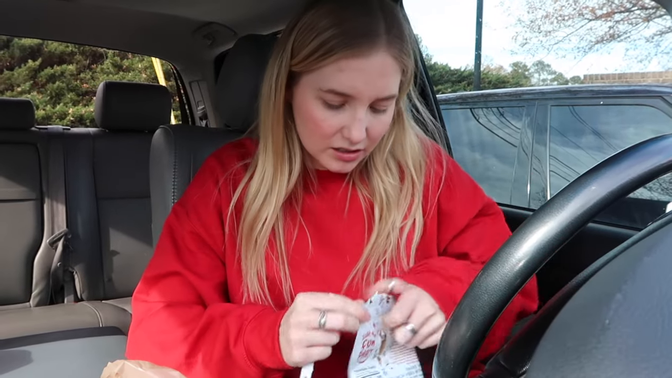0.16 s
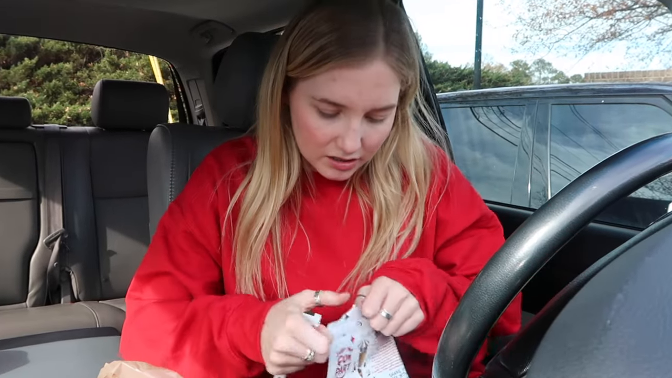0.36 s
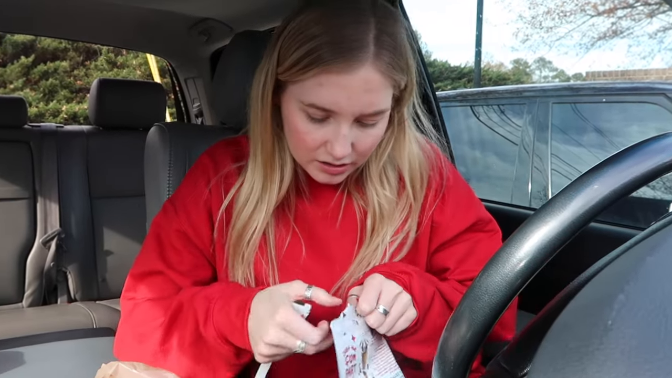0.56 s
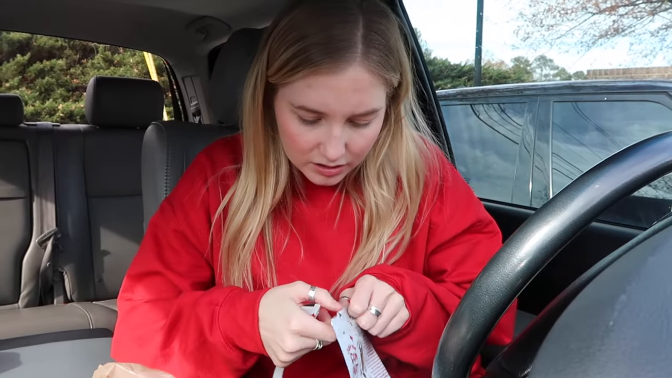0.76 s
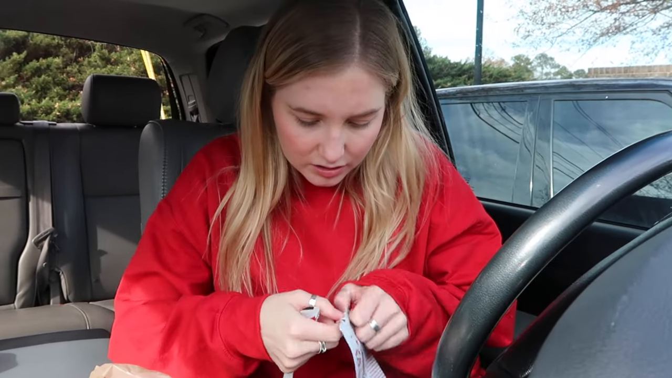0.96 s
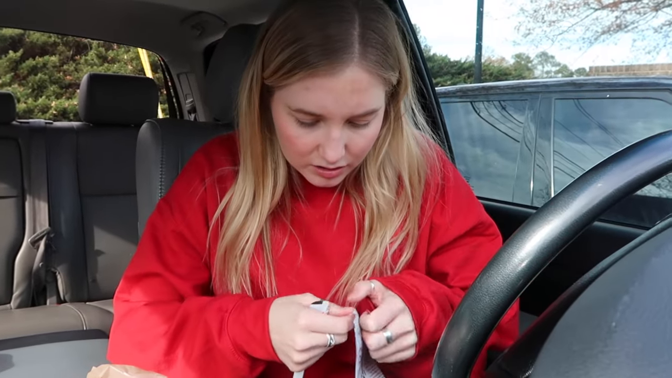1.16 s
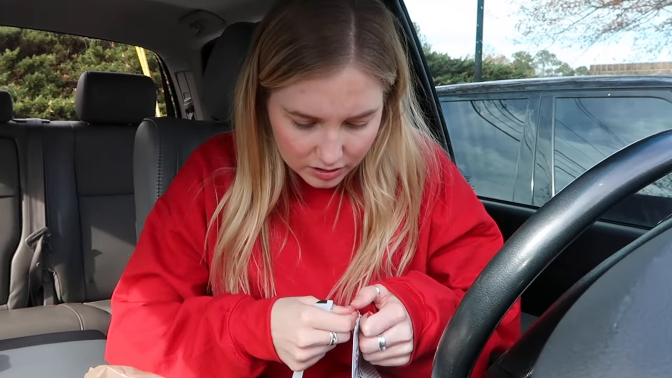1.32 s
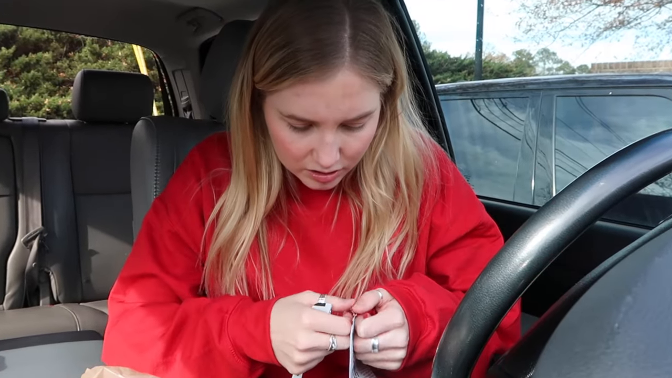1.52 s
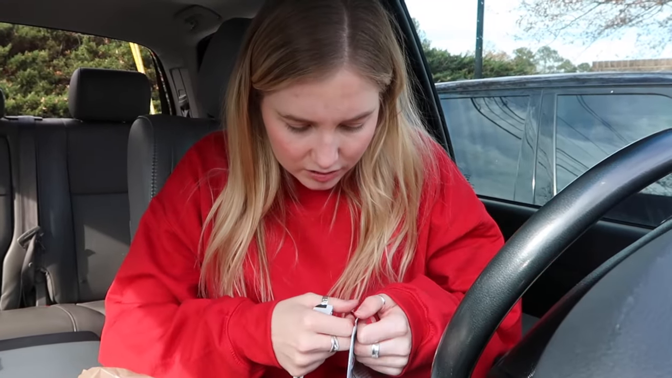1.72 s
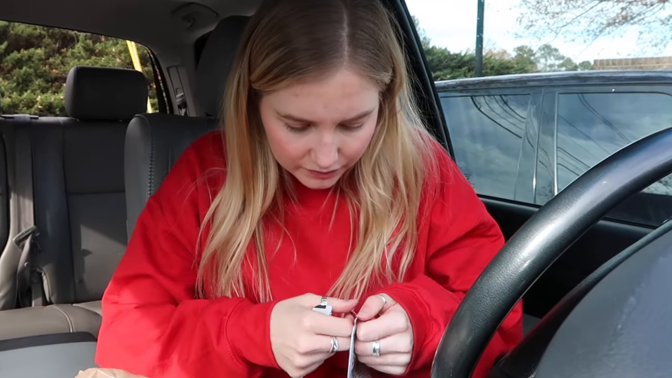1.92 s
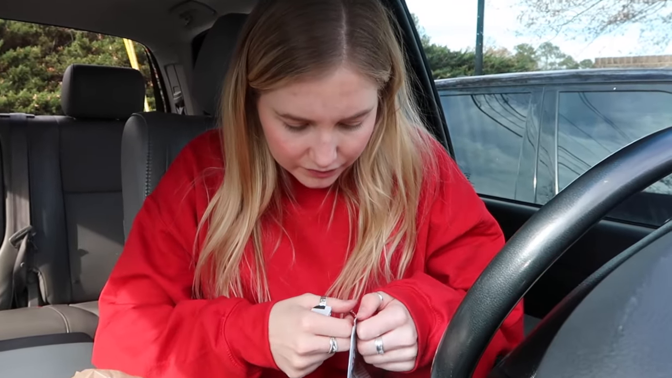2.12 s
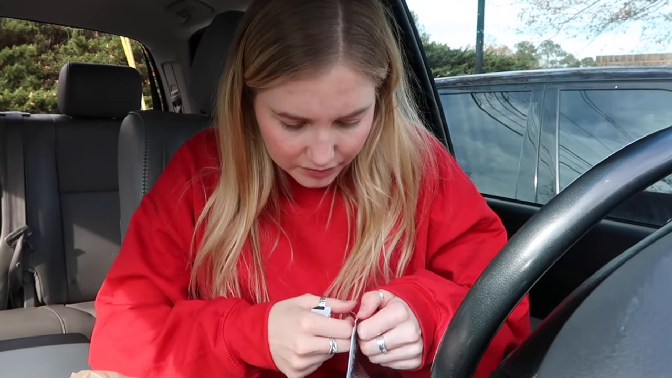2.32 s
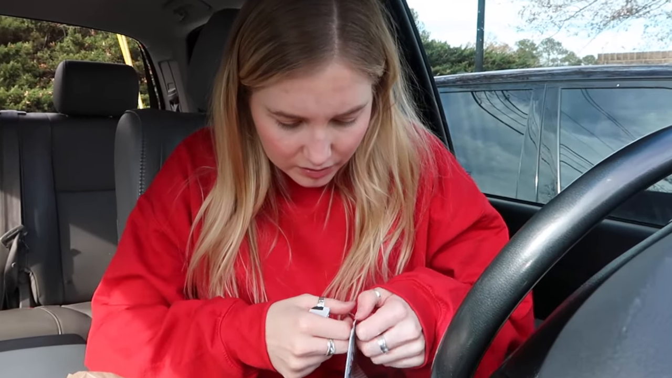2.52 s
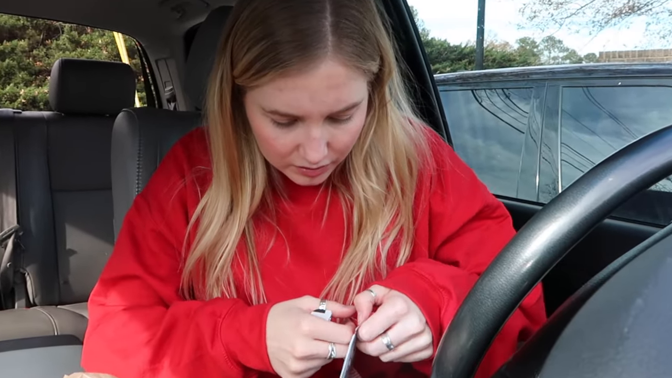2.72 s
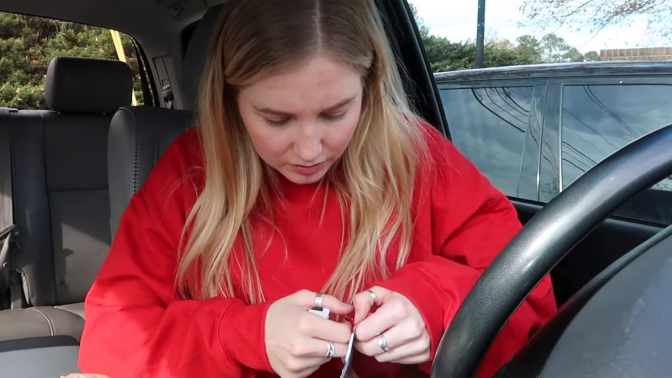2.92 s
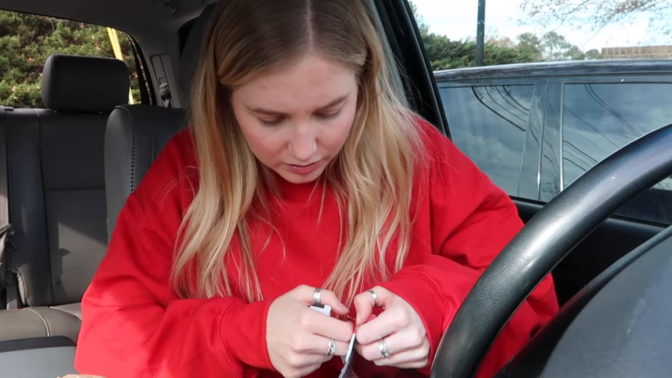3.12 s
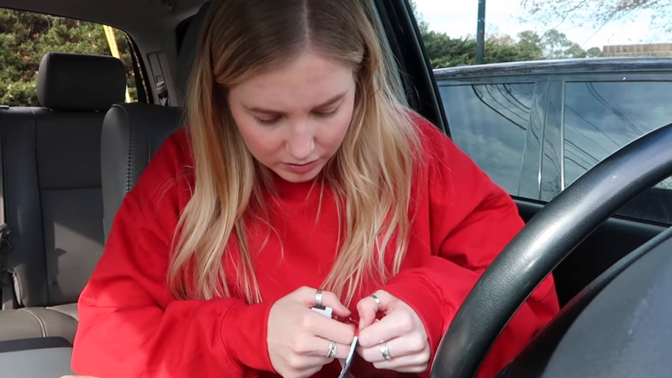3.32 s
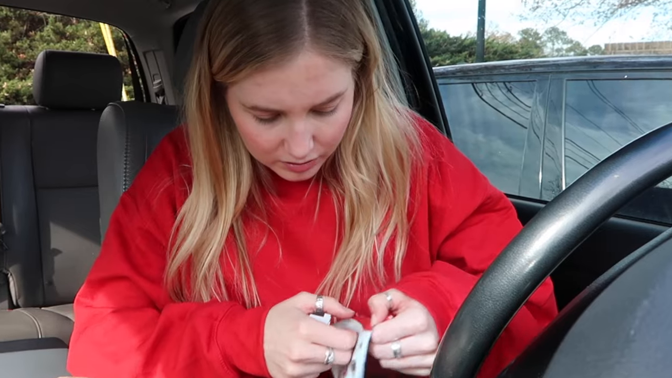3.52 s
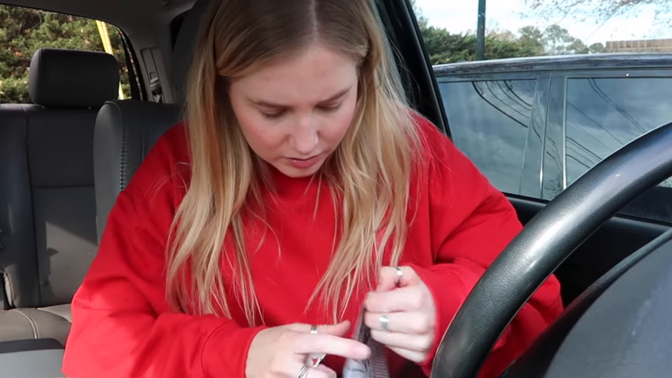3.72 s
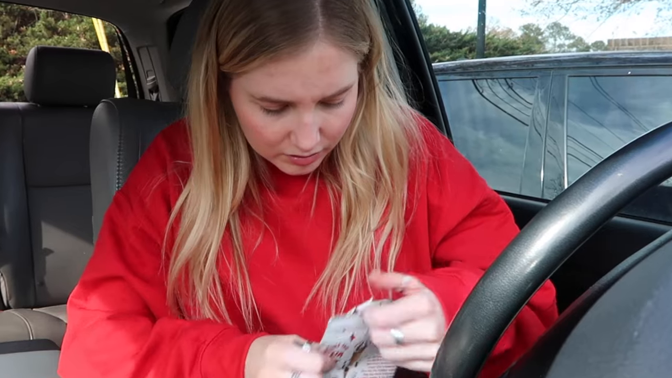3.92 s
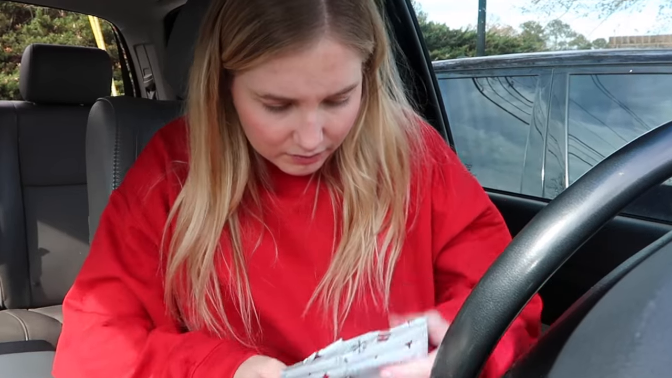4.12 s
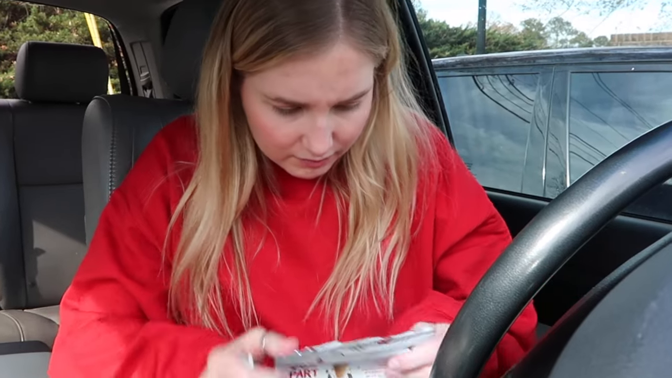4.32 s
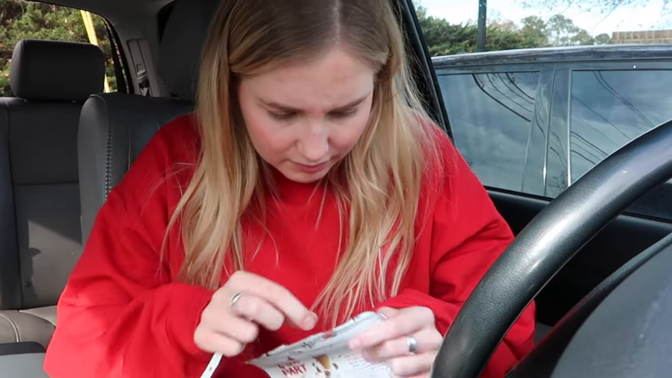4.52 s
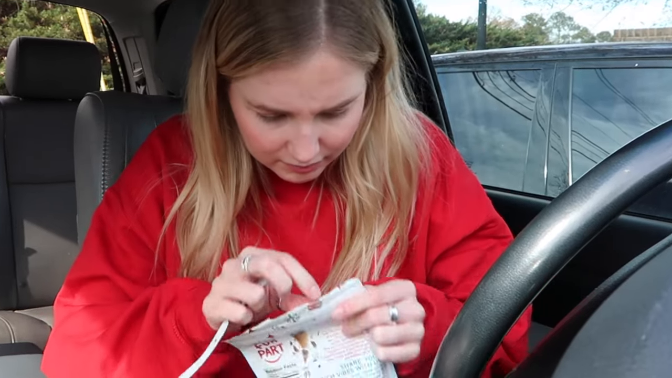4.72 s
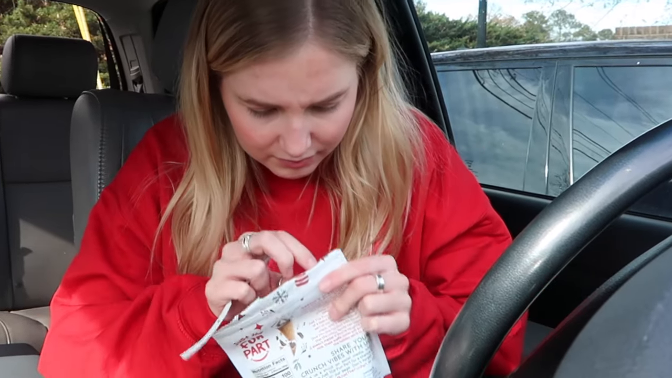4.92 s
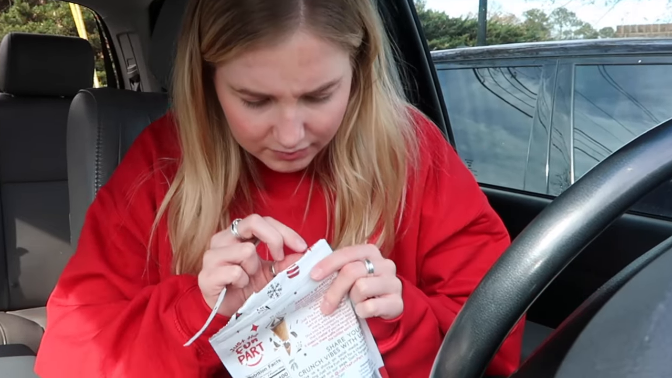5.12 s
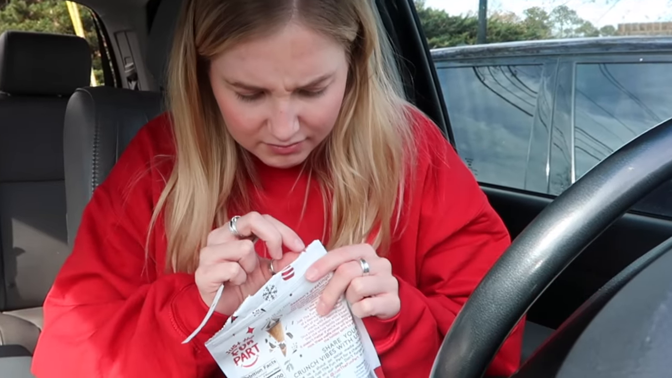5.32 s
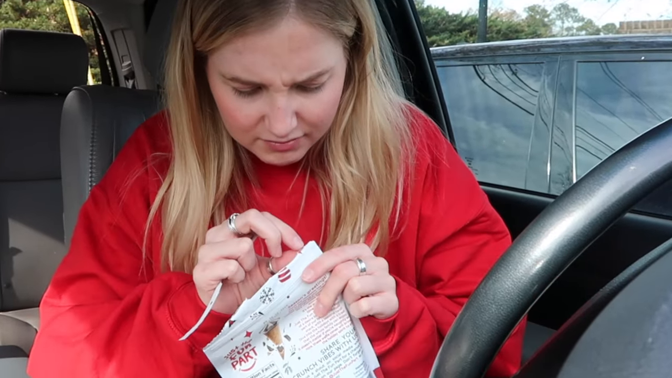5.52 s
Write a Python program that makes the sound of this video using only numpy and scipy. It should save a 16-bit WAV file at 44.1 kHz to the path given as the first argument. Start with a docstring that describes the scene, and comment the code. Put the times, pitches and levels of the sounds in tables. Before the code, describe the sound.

A plastic snack bag is gripped, picked at and turned over in a parked car. Crisp pops and rustling come first, fade to tiny ticks while the fingers work at the seam, return as a thick crackling flurry with brief rubbing, and end sparse. Dry, near sound with a very short cabin reflection; soft deep rumble throughout, no speech.

```python
"""Inside a parked car, fingers pick at the top of a stiff plastic snack pouch and turn it over.
The film buckles in sharp snaps: shaped noise bursts with a kick, ringing briefly in panel and facet.
Between them lie a fine crinkle of random grains, rubbing with narrow squeaks, and faint ticks of nails.
Decaying noise makes the quick answer of the small padded cabin; filtered noise makes a low rumble,
hiss and a thin electronic whine underneath."""
import sys
import numpy as np
from scipy import signal
from scipy.fft import rfft, irfft, next_fast_len
from scipy.io import wavfile
from scipy.ndimage import uniform_filter1d

SR = 44100
rng = np.random.default_rng(int(sys.argv[2]) if len(sys.argv) > 2 else 0)


def persist_wave(psi):
    """Save psi, clipped to +-1, as 16-bit WAV."""
    counts = np.round(np.clip(psi, -1, 1) * 32767).astype(np.int16)
    wavfile.write(sys.argv[1], SR, np.atleast_2d(counts).T)


N = 249606
TIME = np.arange(N) / SR

# Level of the deepest rumble before its trim. Each row: time in seconds, level in dB.
DEEP_LEVEL = [(0.0, -45.5), (0.43, -52), (0.76, -44), (0.85, -51.5), (1.04, -46), (1.7, -48.5),
              (1.94, -40.5), (2.28, -46), (4.3, -48), (4.41, -52), (4.9, -43), (5.41, -52), (5.42, -44),
              (5.66, -47)]
# Level of the upper rumble before its trim. Each row: time in seconds, level in dB.
UPPER_RUMBLE_LEVEL = [(0, -42), (.5, -47), (1.2, -45.5), (1.6, -48.5), (2.0, -47), (2.5, -48), (3.9, -43),
                      (4.45, -48.5), (4.85, -47), (5.66, -47)]
# Relative spectrum of rumble and hiss. Each row: frequency in Hz, density in dB per Hz.
RUMBLE_SPECTRUM = [(12, -42), (24, -11), (39, 1.5), (52, -3.5), (143, -14.5), (183, -12.5), (347, -22.5),
                   (511, -26), (693, -30.5), (889, -33), (1390, -35), (1510, -37.5), (3760, -41),
                   (12400, -56), (13400, -100), (15000, -104)]
# Relative spectrum of the noise in the side signal. Each row: frequency in Hz, density in dB per Hz.
SIDE_HISS_SPECTRUM = [(25, -21), (170, 0.5), (330, 3.5), (600, -4.5),
                      (2000, -11.5), (8000, -26.0), (15000, -23.0)]
# The fingers regrip or turn the pouch; levels before their trims.
# Each row: start in seconds, end in seconds, crinkle in dB, fine fizz in dB.
MOVES = [(0.0, 0.18, -46.5, -57), (0.276, 0.346, -36.5, -62), (0.457, 0.492, -43.5, -52.5),
         (0.838, 1.108, -49, -53.5), (3.735, 3.838, -43.5, -49), (3.975, 4.322, -46.5, -49.5),
         (4.354, 4.442, -45.5, -53), (4.647, 4.763, -50.5, -57.5), (4.897, 5.04, -52.5, -55.5)]
# Relative spectrum of the crinkling film. Each row: frequency in Hz, density in dB per Hz.
CRINKLE_SPECTRUM = [(120, -52), (200, 1.5), (402, -1.5), (854, -7), (930, -5), (1240, -6.5), (2150, -7.5),
                    (2550, -6.5), (6000, -22.5), (7800, -24), (13200, -120)]
# Relative spectrum of the fine fizz. Each row: frequency in Hz, density in dB per Hz.
FIZZ_SPECTRUM = [(3000, -2.5), (5000, -9.5), (8000, -4.5), (11000, -17.5), (13500, -19), (15000, -45)]
# Buckles of the film, before the common trim. Each row: time in seconds, crack level in dB,
# low end, body and edge in dB relative to the crack, ring T60 in seconds, panel pitch in Hz, facet pitch in Hz.
SNAPS = [(0.031, -47.5, 11.5, 6, -26, 0.18, 540, 2300), (0.06, -28, -19, -12.5, -4, 0.036, 1230, 2920),
         (.075, -45.5, 5, 10, 13.5, 0.031, 1500, 3040), (0.132, -44, -30, 2, -3.5, 0.058, 1380, 2130),
         (.2305, -28.5, -2, -5, -19, 0.027, 1140, 2770), (0.237, -28, -4.5, -4, -31, 0.056, 1110, 2880),
         (.248, -31.5, -7, -17, -22, 0.021, 1610, 2400), (0.2793, -30, -12, 6, -2, 0.03, 1080, 1830),
         (0.2981, -29.5, 0.5, -4, -4.5, 0.066, 980, 3760), (.311, -30.5, -2, -6, -19, 0.032, 1620, 3680),
         (.333, -37, 1.5, -0.5, -6, 0.056, 1180, 2730), (.346, -45.5, 2, -2, 5, .04, 900, 2300),
         (0.37, -16, -13, -16.5, -3, 0.019, 1900, 2820), (0.6068, -31, -12, -2.5, -10.5, 0.037, 1350, 1900),
         (.69, -44, 10, 9, -28, 0.17, 930, 2540), (.729, -32.5, -10, -10, -21, 0.21, 1550, 2520),
         (0.878, -42.5, -1, -20, -8, 0.032, 477, 2600), (.947, -47.5, 13, 5.5, -31, 0.036, 1130, 2310),
         (0.984, -47, -2, 8.5, -7, 0.033, 1160, 1980), (1.039, -45.5, 5, 3, -13, 0.084, 630, 2270),
         (1.0545, -30, -14, -26, -10.5, 0.063, 1570, 2560), (1.066, -33, -10, -10, -10, 0.052, 1680, 2340),
         (1.099, -46, -1, 12, -25, 0.019, 910, 2280), (1.138, -47.5, -6, -29, -20, 0.026, 930, 1900),
         (1.213, -47.5, 7.5, 8.5, -17, 0.076, 980, 3400), (1.2196, -31, -8, -13, -7, 0.04, 960, 5200),
         (1.2367, -30, -9.5, -6.5, -6.5, 0.04, 940, 1820),
         (1.2932, -29.5, -1.5, -4.5, -11.5, 0.04, 990, 1730),
         (1.391, -46.5, -2, -6.5, -4.5, 0.15, 970, 2700), (1.51, -42, -8, -5.5, -4, 0.28, 1630, 2550),
         (1.525, -45, 0, -6, -1.5, 0.33, 1380, 3560), (1.872, -48.5, -14, -12, -5, 0.14, 930, 3300),
         (1.891, -50, -4, 4.5, 11.5, 0.033, 430, 7000), (2.136, -66, 20.5, 17, -20, 0.045, 515, 1140),
         (2.301, -60.5, -2, 1, 5, 0.083, 1430, 4000), (2.673, -48, -0.5, -3, -38, 0.035, 750, 1870),
         (2.684, -55.5, 7, 10.5, -35, .04, 600, 2300), (2.93, -42, 4.5, -6, -30, 0.025, 706, 2320),
         (2.939, -51.5, 12.5, 5, -25, 0.069, 615, 1710), (2.955, -52.5, 10.5, 4, -17, 0.054, 600, 2300),
         (3.058, -65.5, 11, 15, -17, 0.038, 1030, 1720), (3.161, -61, 13, 14, -11, 0.035, 1010, 1910),
         (3.167, -63, 18.5, 11, -18, 0.02, 630, 1500), (3.342, -48.5, 0, 4.5, -7, 0.046, 1130, 2700),
         (3.35, -43.5, 4, -4, -23, 0.042, 700, 1680), (3.383, -48, 1, 3, -6, 0.087, 676, 2630),
         (3.439, -45, 1, -1, -8, 0.048, 690, 2300), (3.514, -41, 1, -3.5, -7, 0.17, 676, 2720),
         (3.551, -40.5, -10, -1, -5, 0.37, 1070, 2720), (3.576, -33, -7.5, -12, -6, 0.064, 1360, 3250),
         (3.6017, -26.5, 1, -13, -8, 0.035, 540, 2830), (3.608, -31.5, 1.5, 1, -11, 0.063, 520, 2550),
         (3.617, -30.5, -3, -1, -13, 0.069, 1340, 3030), (3.658, -34.5, 5, 4.5, -24, 0.077, 930, 2360),
         (3.677, -33, -9, -2, -22, 0.072, 1500, 2700), (3.692, -40, -1, -9, -28, 0.051, 1590, 2270),
         (3.71, -39, -13, -7, -35, 0.045, 1020, 3000), (3.748, -38.5, -1, -18, 0, 0.11, 1100, 3150),
         (3.754, -24, -18, -8.5, -11, 0.11, 1590, 3080), (3.764, -34.5, -6, -2, 7.5, 0.057, 1160, 3300),
         (3.824, -32, 2.5, 3.5, -26, 0.025, 790, 2220), (3.8272, -26.5, -16, -1, -37, 0.052, 1130, 1900),
         (3.854, -29, 2.5, 0, -18, 0.11, 1000, 2730), (3.863, -36.5, -1, -7, -6, 0.063, 800, 1980),
         (3.875, -29, -13, -10, -10, 0.033, 1090, 3350), (3.883, -21, -10.5, -15, -14, 0.046, 1070, 3250),
         (3.9025, -30, -15, -3, -11, 0.028, 1540, 3430), (3.9123, -21.5, -7, -11, -15, .05, 1146, 3350),
         (4.033, -45, 6, 1, -32, 0.11, 1440, 2980), (4.066, -27, -18, -9.5, -1, 0.024, 950, 4320),
         (4.107, -45.5, 5, 8, -24, 0.12, 1210, 1810), (4.132, -50, 16, 1, -24, 0.12, 794, 1800),
         (4.148, -58, 11, 6, -20, 0.046, 400, 1790), (4.1752, -40, 4.5, 5, -30, 0.042, 1140, 2390),
         (4.25, -41.5, 13, 12, -25, 0.028, 955, 1900), (4.2552, -44, 14, 15, -32, .03, 506, 1500),
         (4.314, -29.5, -6, 7.5, -18, 0.082, 826, 2760), (4.3207, -20.5, -6.5, 2.5, -10, 0.02, 930, 3900),
         (4.34, -27.5, -1.5, 0, -18, 0.093, 990, 2300), (4.367, -29, -6, -2, -15, 0.1, 1560, 2750),
         (4.407, -39.5, -3, -8, -30, 0.073, 560, 3000), (4.444, -45.5, 3.5, 0, -24, 0.026, 452, 2380),
         (4.467, -45.5, -15, -10, -28, .03, 1000, 2500), (4.505, -51, 5, -1, -25, 0.041, 400, 2420),
         (4.5521, -26.5, -13, -4.5, -19, 0.016, 1130, 3200),
         (4.558, -33.5, -18, 8.5, -22, 0.019, 760, 1670), (4.917, -43, -6, -14, -7.5, 0.12, 1500, 3260),
         (5.082, -53, 17, 15.5, -29, 0.044, 720, 2250), (5.144, -52.5, 0, -5, 1, 0.038, 690, 3430),
         (5.3196, -23, -8, -7.5, -11, 0.026, 1120, 2680), (5.44, -44, -30, -34, -9.5, 0.059, 1520, 3200),
         (5.52, -49.5, -18, -10, -14, .052, 1540, 2920)]
# Bands of a snap: low end, body, crack, edge. Each row: lower limit in Hz, upper limit in Hz.
SNAP_BANDS = [(180, 650), (650, 1500), (1500, 4200), (5000, 12000)]
# Fingers sliding on the film. Each row: start in seconds, end in seconds, scrape level in dB,
# squeak pitch at mid-stroke in Hz, its fall in Hz per second, squeak level in dB.
RUBS = [(0.584, 0.762, -40, 2547, -1, -47), (1.52, 1.591, -46.5, 3470, 6, -70),
        (4.357, 4.496, -46.5, 2500, 2501, -52), (4.54, 4.63, -55, 1440, 6000.5, -50.5),
        (4.934, 5.086, -48, 2890, 0, -61)]
# Fingernails picking at the seam. Each row: start in seconds, end in seconds, mean level in dB.
PICKS = [(2.5, 2.58, -72.5), (2.741, 2.86, -73), (3.076, 3.14, -73), (3.208, 3.306, -84)]
# Resonances of the pouch. Each row: frequency in Hz, width in Hz, boost in dB.
POUCH_RESONANCES = [(930, 57, 2), (1110, 87, 4), (2540, 360, 2), (1900, 100, 1.5), (3760, 660, 4),
                    (3440, 65, 1)]
# Phase part of the microphone pair. Each row: frequency in Hz, side against mid in dB.
PAIR_WIDTH = [(100, -45), (1000, -34), (2200, -28), (3700, -8), (6500, -14.5), (8300, -3.5), (12000, 13)]
# Scattered part, opposite in the two ports. Each row: frequency in Hz, level against mid in dB.
SCATTER = [(300, -43), (1000, -22), (2200, -16.5), (3700, -12.5), (6500, 2), (9000, 0), (12000, 11)]

HOLD_CRINKLE_DB, HOLD_FIZZ_DB = -62, -66   # least effort, the pouch merely held; before the trims
MOVE_ATTACK_S, MOVE_RELEASE_S = 0.023, 0.17   # linear rise ending at the start; exponential time constant
CREASES_PER_S, TICKS_PER_S, TICK_DB = 1500, 90, -2
CLUMP_DB, SLIP_JERK_DB = 2.5, 2   # depth of the random swings of crinkle and rubbing
# how strongly and how narrowly a snap rings in its panel and its facet
PANEL_BOOST, FACET_BOOST = 1.3, 1.4
PANEL_WIDTH_HZ, FACET_WIDTH_HZ, FACET_DAMPING = 90, 91, 5   # damping over ring T60 adds to the facet width
STRAIN_DB, STRAIN_S = -23, .003   # faint creak before a snap and the time constant of its rise
KICK, RAGGED_DB = 3.7, 2.5   # kick against the rattle; unevenness of the rattle
SPREAD_S = .0004   # arrival lag of the kick at 2500 Hz
CABIN_T60_S = 0.086
SCATTER_T60_S, OFF_CENTRE = .03, .09   # off centre: share by which the right port is louder in the highs
CUTOFF_HZ = 15400


def from_db(db):
    """Logarithmic scale: decibels to amplitude gain."""
    return 10 ** (np.asarray(db) / 20)


def rms_one(x):
    """Normalization of effective value: scale to rms 1."""
    return x / np.sqrt(np.mean(x ** 2) + 1e-20)


def at_hz(points, hz):
    """Logarithmic pitch scale: interpolate a spectrum along log frequency."""
    f, value = np.transpose(points)
    return np.interp(np.log(np.maximum(hz, 1)), np.log(f), value)


def band(x, low, high, order=2):
    """Causal band-pass filtering: no output precedes its input."""
    sos = signal.butter(order, [low, min(high, .45 * SR)], "band", fs=SR, output="sos")
    return signal.sosfilt(sos, x)


def coloured(x, spectrum):
    """Spectral shaping: multiply the transform by a spectrum, then scale to rms 1."""
    size = next_fast_len(N)
    gain = from_db(at_hz(spectrum, np.fft.rfftfreq(size, 1 / SR)))
    return rms_one(irfft(rfft(x, size) * gain, size)[:N])


def resonance(x, hz, width_hz):
    """Damped oscillator: a two-pole resonance with gain about 1 at its peak."""
    r = np.exp(-np.pi * width_hz / SR)
    numerator = np.array([1, 0, -1]) * (1 - r * r) / 2
    denominator = [1, -2 * r * np.cos(2 * np.pi * hz / SR), r * r]
    return signal.lfilter(numerator, denominator, x + 1e-18)


def grains(per_s, spread_db):
    """Random impulse process: tiny clicks at chance moments, a few much larger than the rest."""
    sizes = from_db(spread_db * np.minimum(rng.exponential(1, N), 4))
    return (rng.random(N) < per_s / SR) * sizes * rng.choice([-1, 1], N)


def wander(size):
    """Moving average of noise: smooth chance that changes about every size samples; rms 1."""
    return rms_one(uniform_filter1d(rng.standard_normal(N), size=size))


def background(deep_db, low_db, hiss_db, side_hiss_db, whine_db, whine_hz):
    """Filtered noise: rumble through the car body, microphone hiss, narrow-band whine; mid and side."""
    rumble = coloured(rng.standard_normal(N), RUMBLE_SPECTRUM)
    deep = signal.sosfiltfilt(signal.butter(2, 110, fs=SR, output="sos"), rumble)
    low = signal.sosfiltfilt(signal.butter(2, 280, fs=SR, output="sos"), rumble)
    # even out chance swings of the deep noise, so that its level table sets the swells
    steady = deep / np.sqrt(uniform_filter1d(deep ** 2, size=SR // 4))
    deep_gain = from_db(deep_db + np.interp(TIME, *np.transpose(DEEP_LEVEL)))
    low_gain = from_db(low_db + np.interp(TIME, *np.transpose(UPPER_RUMBLE_LEVEL)))
    mid = deep_gain * steady + low_gain * (low - deep) + from_db(hiss_db) * (rumble - low)
    whine = rms_one(resonance(resonance(rng.standard_normal(N), whine_hz, 52), whine_hz, 52))
    side = coloured(rng.standard_normal(N), SIDE_HISS_SPECTRUM)
    return mid + from_db(whine_db) * whine, from_db(side_hiss_db) * side


def effort(start, end):
    """Envelope of a force: a move of the fingers builds up, holds and dies away."""
    rise = np.clip((TIME - start) / MOVE_ATTACK_S + 1, 0, 1)
    return rise * np.exp(-np.maximum(TIME - end, 0) / MOVE_RELEASE_S)


def crinkle(crinkle_db, fizz_db, tick_width_hz):
    """Granular emission: tiny creases give way in clumps; larger ones tick, each at one of 16 pitches."""
    work, fine = from_db(HOLD_CRINKLE_DB), from_db(HOLD_FIZZ_DB)
    for start, end, work_db, fine_db in MOVES:
        move = effort(start, end)
        work = np.maximum(work, from_db(work_db) * move)
        fine = np.maximum(fine, from_db(fine_db) * move)
    clumps = from_db(CLUMP_DB * np.clip(wander(size=SR // 50), -2, 2))
    creases = rms_one(clumps * grains(per_s=CREASES_PER_S, spread_db=3.0))
    ticks = grains(per_s=TICKS_PER_S, spread_db=2.5)
    dealt = rng.integers(0, 16, N)   # which pitch a tick gets
    pitches = np.geomspace(700, 5000, 16)
    rings = rms_one(sum(resonance(ticks * (dealt == k), hz, tick_width_hz) for k, hz in enumerate(pitches)))
    ticking = coloured(rings + .5 * rms_one(ticks), CRINKLE_SPECTRUM)
    rustle = rms_one(coloured(creases, CRINKLE_SPECTRUM) + from_db(TICK_DB) * ticking)
    fizz = coloured(creases, FIZZ_SPECTRUM)
    return from_db(crinkle_db) * work * rustle + from_db(fizz_db) * fine * fizz


def facet(sound, panel_hz, facet_hz, ring_s):
    """Modal resonance at constant energy: panel and flipping facet ring, less clearly in a short snap."""
    facet_width_hz = FACET_WIDTH_HZ + FACET_DAMPING / max(ring_s, .01)
    panel_ring = PANEL_BOOST * resonance(sound, panel_hz, PANEL_WIDTH_HZ)
    facet_ring = FACET_BOOST * resonance(sound, facet_hz, facet_width_hz)
    rung = sound + panel_ring + facet_ring
    return rung * np.linalg.norm(sound) / np.linalg.norm(rung)


def snaps(level_db, flutter, flutter_t60_s, low_ring, bass_db, knee_db, top_db):
    """Buckling instability: a crease strains, gives way with a kick, flutters and rattles out."""
    s, crack, low_end, body, edge, ring, panel_hz, facet_hz = np.transpose(SNAPS)
    lead = SR // 80
    age = np.arange(-lead, SR // 8) / SR
    after = np.maximum(age, 0)
    white = rng.standard_normal((len(s), 3, len(age)))
    # the film lets go in jerks about two milliseconds long
    jerks = from_db(RAGGED_DB * rms_one(uniform_filter1d(white[:, 2], size=90, axis=1)))
    strain = from_db(STRAIN_DB) * np.exp(np.minimum(age, 0) / STRAIN_S)
    # band levels become densities per Hz, which are joined into one spectrum over the centres
    levels = np.array([low_end, body, 0 * crack, edge]) + crack
    low_end, body, crack, edge = levels - 10 * np.log10(np.diff(SNAP_BANDS))
    density = np.array([low_end + bass_db, low_end, body, crack, crack + knee_db, edge, edge + top_db])
    centres = [90, 340, 1000, 2200, 4000, 7700, 15000]
    edges = np.geomspace(100, 16000, 14)
    sounds = 0
    for k, (low, high) in enumerate(zip(edges, edges[1:])):
        hz = np.sqrt(low * high)
        # the rattle lasts longest in the lows
        t60 = np.maximum(ring, .008)[:, None] * (2500 / hz) ** low_ring
        fade = from_db(-60 * after / t60) + flutter * from_db(-60 * after / flutter_t60_s)
        rattle = white[:, k % 2] * jerks * np.where(age < 0, strain, fade)
        # bending waves are dispersive: the highs arrive first
        arrival = np.arange(len(age)) == lead + int(SPREAD_S * SR * np.sqrt(2500 / hz))
        wave = band(rattle + KICK * (-1) ** k * arrival, low, high, order=3 if hz > 2000 else 2)
        # equal energy in each band: that of rms 1 over 10 ms
        wave /= np.sqrt(np.sum(wave ** 2, axis=1, keepdims=True) / (.01 * SR))
        gain = from_db([np.interp(np.log(hz), np.log(centres), d) for d in density.T])
        sounds = sounds + wave * gain[:, None] * np.sqrt(high - low)
    out = np.zeros(N + len(age))
    starts = np.round(s * SR).astype(int) - lead
    for start, sound, low_hz, high_hz, ring_s in zip(starts, sounds, panel_hz, facet_hz, ring):
        out[start:start + len(age)] += facet(sound, low_hz, high_hz, ring_s)
    return from_db(level_db) * out[:N]


def rubs(rise_s, fall_s, squeak_width_hz):
    """Stick-slip friction: skin jerks along the film and stirs one squeak, gliding as the film slackens."""
    jerks = from_db(SLIP_JERK_DB * np.clip(wander(size=SR // 200), -2, 2))
    scrape = coloured(jerks * grains(per_s=1800, spread_db=2.0), CRINKLE_SPECTRUM)
    waver = squeak_width_hz * wander(size=SR // 300)
    out = 0
    for start, end, level_db, squeak_hz, fall_hz_per_s, squeak_db in RUBS:
        stroke = np.clip((TIME - start) / rise_s, 0, 1) * np.clip((end - TIME) / fall_s, 0, 1)
        pitch = squeak_hz - fall_hz_per_s * (TIME - (start + end) / 2) + waver
        squeak = rms_one(np.sqrt(jerks) * np.sin(2 * np.pi * np.cumsum(pitch) / SR))
        out = out + stroke * (from_db(level_db) * scrape + from_db(squeak_db) * squeak)
    return out


def picking(per_s, ring_width_hz, seam_hz, dry_share):
    """Impulse excitation: nails catch on the stiff seam in short runs of faint, high ticks."""
    clicks = np.zeros(N)
    for start, end, level_db in PICKS:
        s = np.arange(start, end, 1 / per_s)
        s = s + rng.uniform(-.3, .3, len(s)) / per_s
        sizes = from_db(level_db + rng.normal(0, 2, len(s)))
        clicks[(s * SR).astype(int)] = sizes * np.sqrt(SR / per_s)   # the run as a whole has the level
    click = signal.unit_impulse(SR // 50)
    tick = resonance(click, seam_hz, ring_width_hz) + dry_share * band(click, 1000, 5500)
    return signal.fftconvolve(clicks, tick / np.linalg.norm(tick))[:N]


def cabin(x, first_s, dull_hz):
    """Diffuse reverberation: dense reflections off glass and dashboard, soon swallowed by the seats."""
    age = np.arange(SR // 4) / SR
    onset = np.clip(age / first_s - 1, 0, 1)
    echoes = rng.standard_normal(len(age)) * from_db(-60 * age / CABIN_T60_S) * onset
    echoes = echoes / np.linalg.norm(echoes)
    echoes = signal.sosfilt(signal.butter(1, min(dull_hz, .45 * SR), fs=SR, output="sos"), echoes)
    return signal.fftconvolve(x, echoes)[:N]


def microphone_side(mid):
    """Phase difference and scattering: the right port hears first and louder; hands and wheel scatter highs."""
    size = next_fast_len(N + SR // 10)
    hz = np.fft.rfftfreq(size, 1 / SR)
    age = np.arange(SR // 50) / SR
    scatter = rng.standard_normal(len(age)) * from_db(-60 * age / SCATTER_T60_S) * (age > .001)
    scattered = from_db(at_hz(SCATTER, hz)) * rfft(scatter / np.linalg.norm(scatter), size)
    phase = -1j * from_db(at_hz(PAIR_WIDTH, hz))   # a quarter turn between side and mid
    shade = OFF_CENTRE * np.clip(hz / 2500, 0, 1) ** 2
    return irfft(rfft(mid, size) * (phase + scattered - shade), size)[:N]


def scene():
    """Superposition: the pouch close in front of the microphone, its cabin echo and the background."""
    film = snaps(level_db=0.5, flutter=0.11, flutter_t60_s=0.083, low_ring=0.13,
                 bass_db=-7.0, knee_db=-6.5, top_db=-39.5)
    film = film + crinkle(crinkle_db=-5.0, fizz_db=-8.0, tick_width_hz=78)
    film = film + rubs(rise_s=0.07, fall_s=0.012, squeak_width_hz=77)
    film = film + picking(per_s=32, ring_width_hz=200, seam_hz=3900, dry_share=.15)
    pouch = film + sum((from_db(boost_db) - 1) * resonance(film, hz, width_hz)
                       for hz, width_hz, boost_db in POUCH_RESONANCES)
    near = pouch + from_db(-9.0) * cabin(pouch, first_s=0.0033, dull_hz=7900)
    near_side = microphone_side(near)
    floor_mid, floor_side = background(deep_db=-1.0, low_db=1.5, hiss_db=-45.0, side_hiss_db=-55.5,
                                       whine_db=-75.5, whine_hz=13010)
    mid, side = near + floor_mid, near_side + floor_side
    return np.array([mid + side, mid - side])   # left, right


def record(dry):
    """Clipping and band limitation: peaks are cut flat, then a steep low-pass removes the top."""
    low_pass = signal.ellip(10, .1, 80, CUTOFF_HZ, fs=SR, output="sos")
    return signal.sosfilt(low_pass, np.clip(dry, -.85, .85))


dry = scene()
out = record(dry)
persist_wave(out)
```